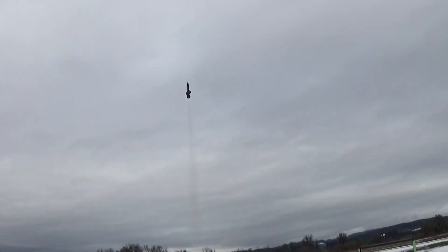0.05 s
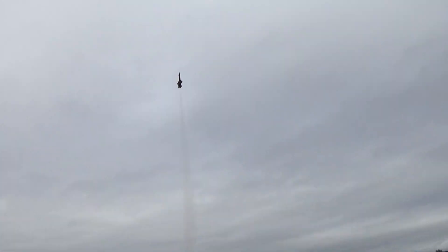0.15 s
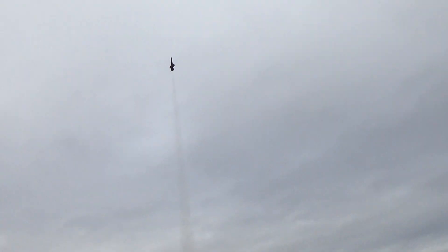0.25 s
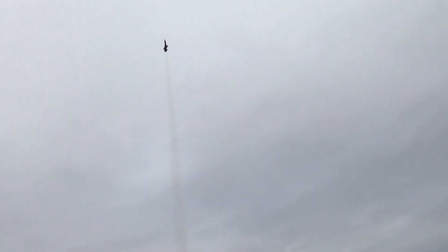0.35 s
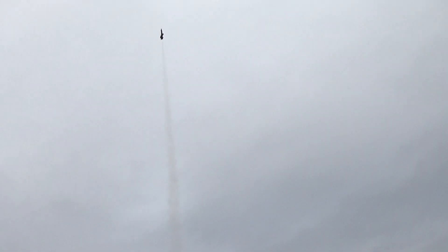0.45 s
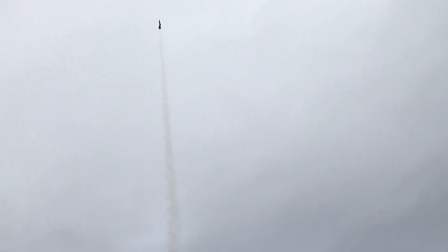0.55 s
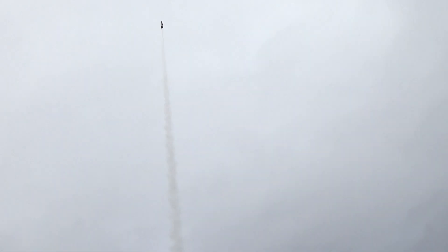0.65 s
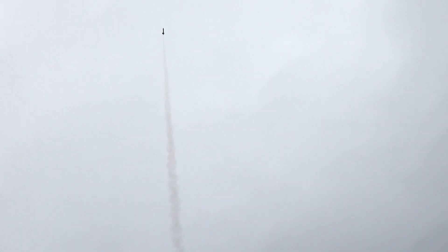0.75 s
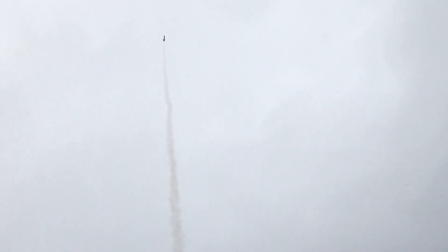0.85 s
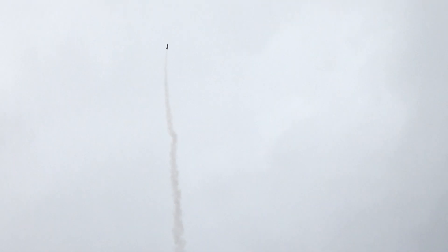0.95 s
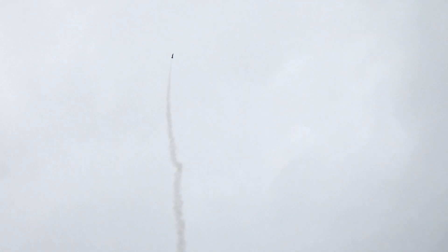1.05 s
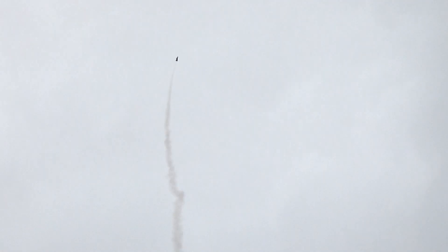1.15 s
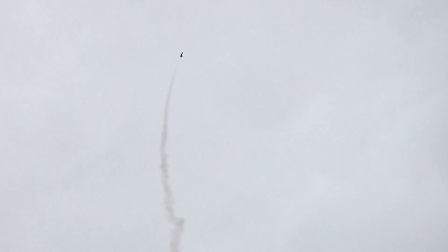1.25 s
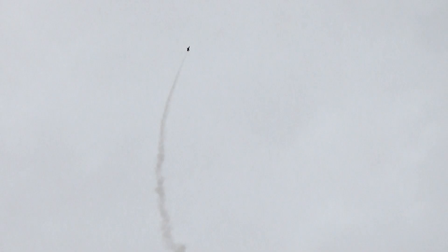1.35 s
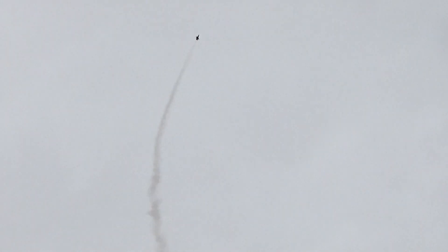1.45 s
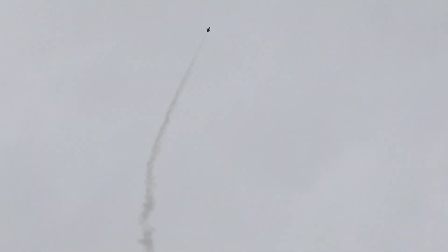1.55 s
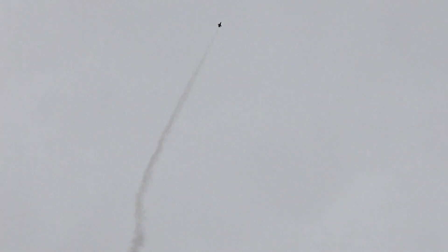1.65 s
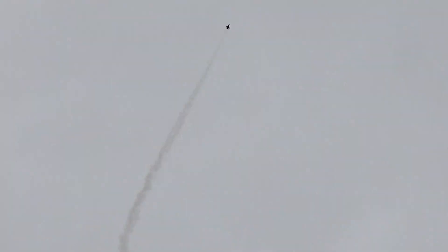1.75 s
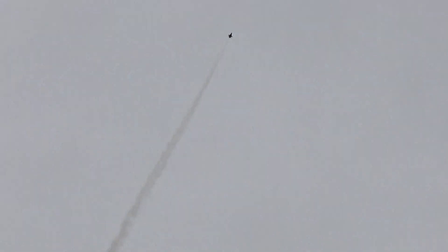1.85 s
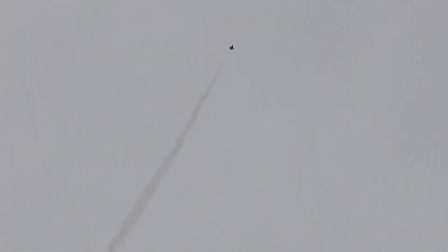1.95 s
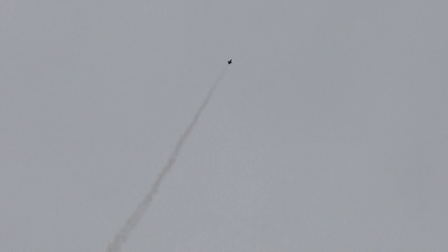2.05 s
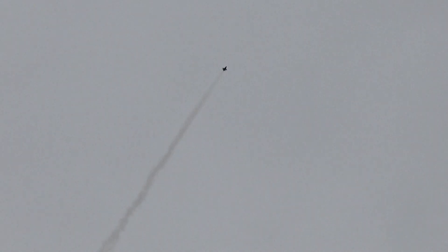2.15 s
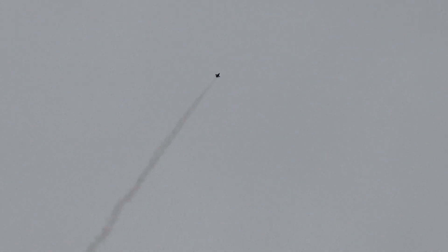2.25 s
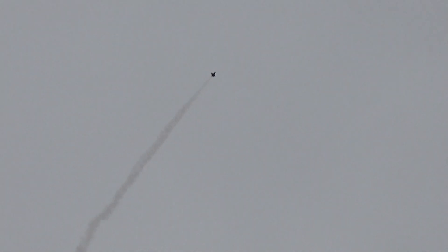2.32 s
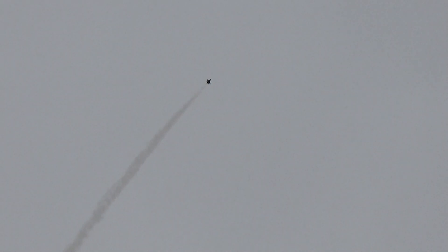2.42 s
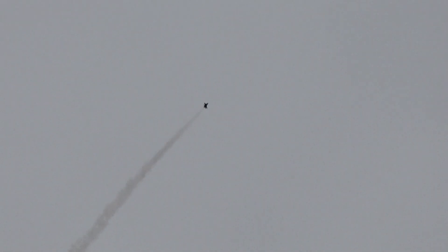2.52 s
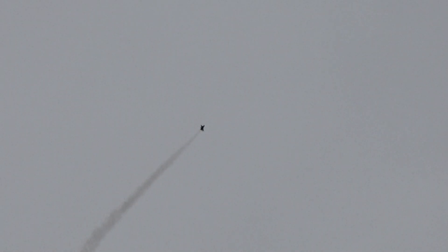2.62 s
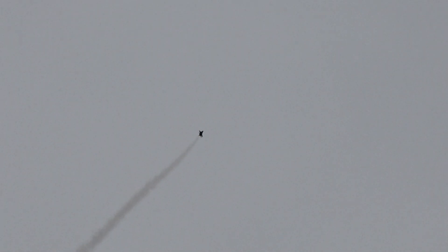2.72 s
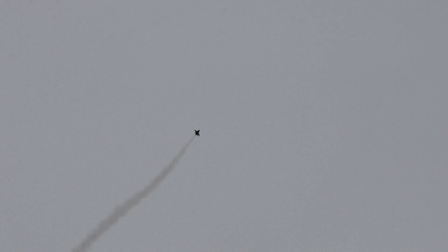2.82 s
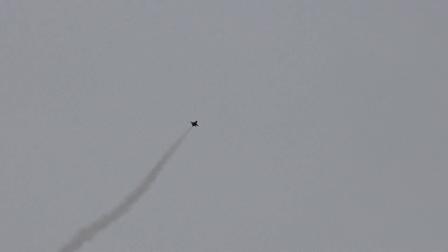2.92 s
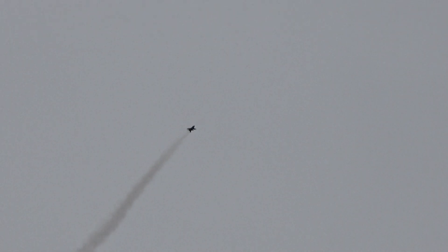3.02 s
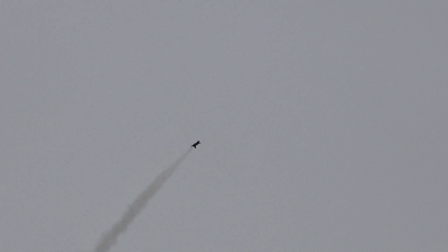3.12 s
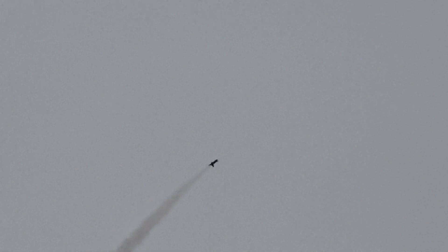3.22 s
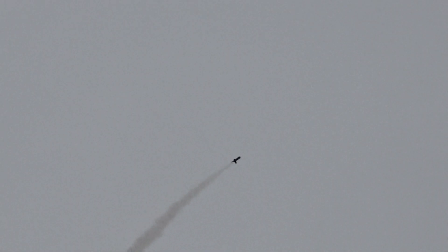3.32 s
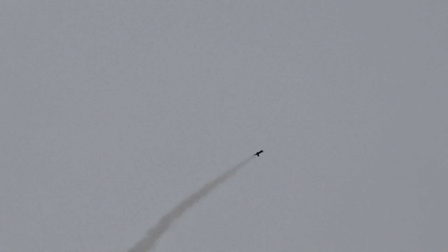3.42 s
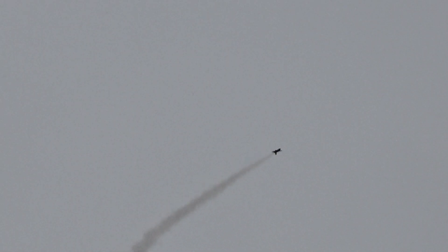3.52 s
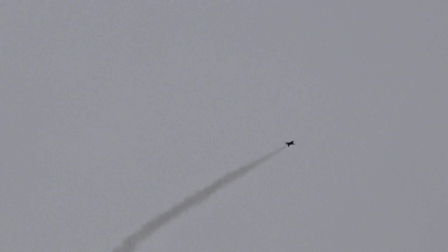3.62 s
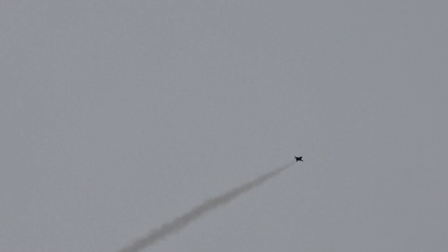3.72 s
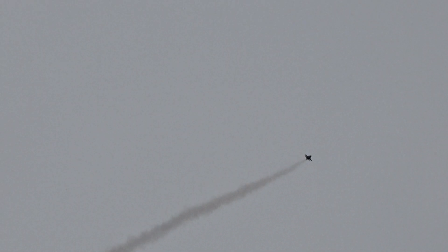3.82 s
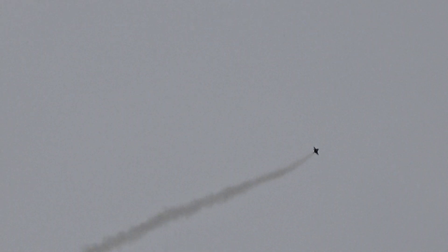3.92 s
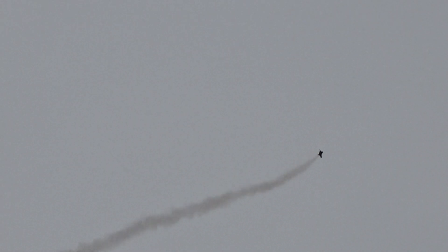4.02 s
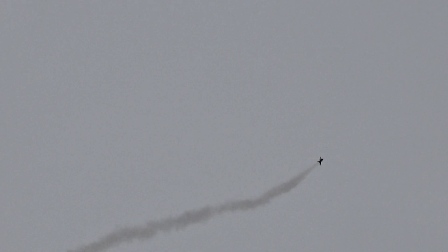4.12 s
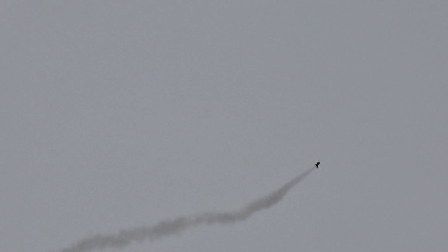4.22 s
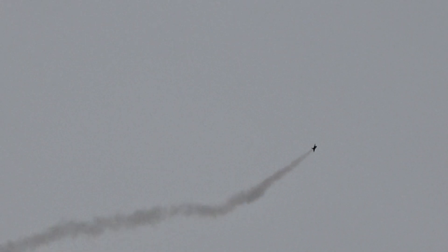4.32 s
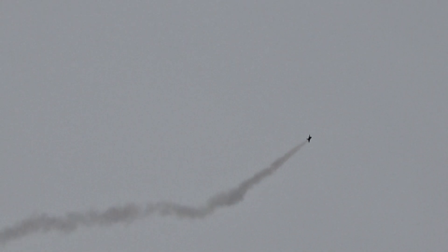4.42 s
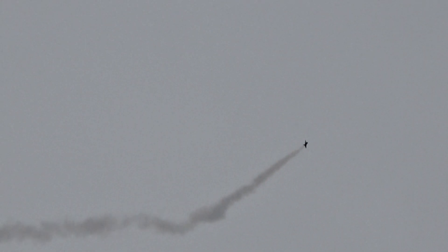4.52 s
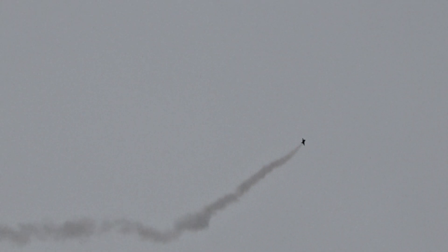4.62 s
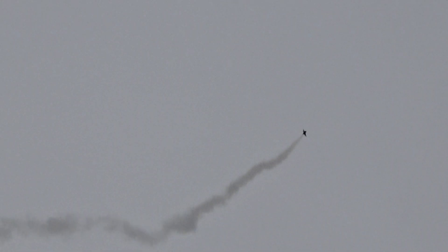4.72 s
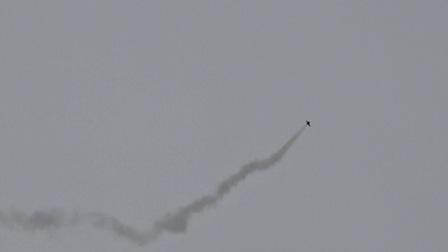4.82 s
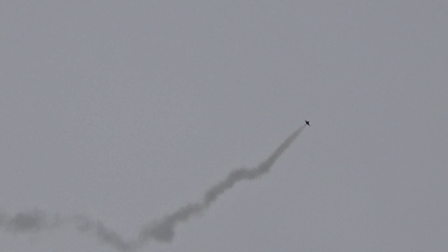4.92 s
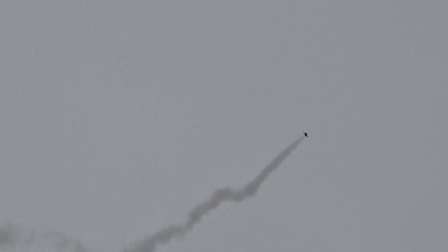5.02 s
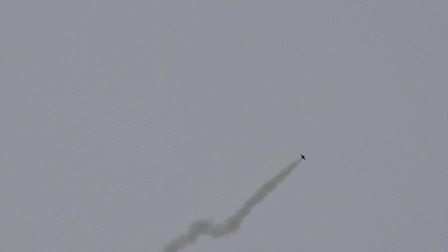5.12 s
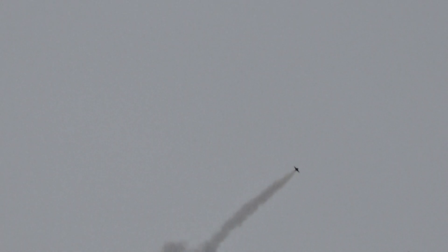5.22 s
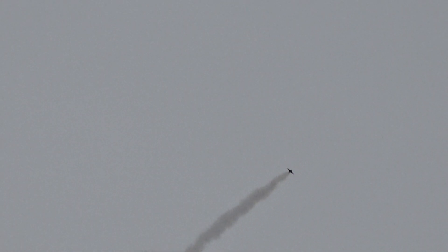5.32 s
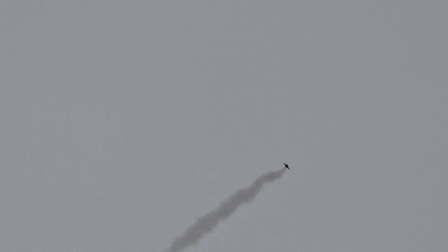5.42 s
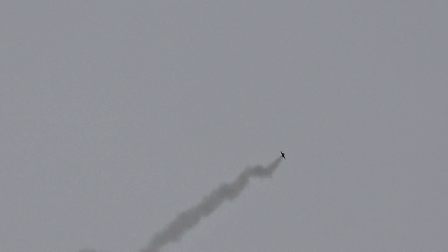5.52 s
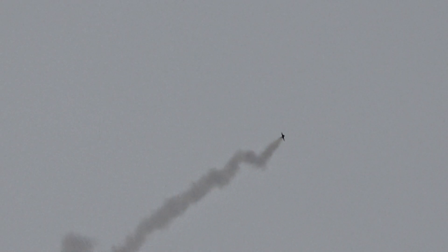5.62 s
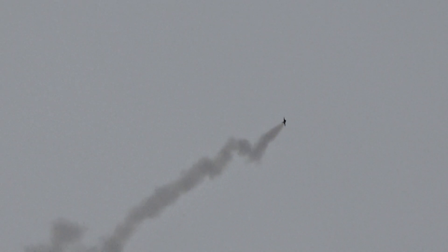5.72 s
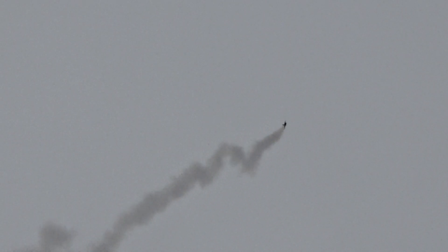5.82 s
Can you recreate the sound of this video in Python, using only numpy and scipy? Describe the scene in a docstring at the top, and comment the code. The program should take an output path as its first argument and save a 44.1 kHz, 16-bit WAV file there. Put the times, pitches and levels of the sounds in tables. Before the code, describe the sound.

A model rocket motor burns with a loud bright crackling hiss, growing duller and more fluttery as it climbs away over an open field.

```python
"""A small solid-fuel motor burns with a bright hiss while the model climbs away and rolls over an open field.
Shaped noise makes the jet: air dulls it with distance, shock fronts crackle in it, dips sweep its treble.
The ground adds a delayed, duller copy of the climb, and single snaps stand out as short pressure pulses.
Soft shaped noise and a distant engine's sine tones lie behind, sinking at first and then swelling.
Dull knocks close to the microphone ring damped modes; one faint low tone rises and fades."""
import sys
import numpy as np
from scipy import signal
from scipy.fft import rfft, irfft
from scipy.io import wavfile
from scipy.ndimage import map_coordinates

SR = 44100
rng = np.random.default_rng(int(sys.argv[2]) if len(sys.argv) > 2 else 0)


def attenuation_scalar(level_db):
    """Turn a level in dB into a linear amplitude multiplier (20 dB per decade)."""
    decades = np.asarray(level_db, float) / 20
    return 10 ** decades


def materialize(psi):
    """Save the field psi as 16-bit PCM at rate SR to the path in sys.argv[1].

    A 1-D psi becomes a single channel; in a 2-D psi each row is a channel.
    """
    bounded = np.clip(np.atleast_2d(psi).T, -1, 1)
    quanta = np.round(bounded * 32767).astype(np.int16)
    wavfile.write(sys.argv[1], SR, quanta)


N = 258237   # length in samples
FRAME, HOP = 512, 128   # analysis frame and its step in samples
HZ = np.maximum(np.fft.rfftfreq(FRAME, 1 / SR), 20)[:, None]   # analysis frequencies, one row each

# The field behind and the place of the jet.
# Each row: time in seconds, background level in dB, how far the jet stands to the right (0-1).
FIELD_AND_PLACE = [(0, -55.5, 0.75), (.7, -67, 0), (1.4, -62.5, 0.45), (2, -56, 0.72), (4, -47.5, 1),
                   (4.8, -45, .99), (5.86, -42.5, 0.96)]


def at_hz(points):
    """Reads a spectrum table at every analysis frequency, along a logarithmic scale."""
    hz, db = np.transpose(points)
    return np.interp(np.log(HZ), np.log(hz), db)


def in_time(rows, s):
    """Reads the columns of a curve table at times s in seconds."""
    t, *columns = np.transpose(rows)
    return [np.interp(s, t, column) for column in columns]


def to_right(s):
    """How far the jet stands to the right at times s, from 0 to 1."""
    return in_time(FIELD_AND_PLACE, s)[1]


def shaped(x, gain_db):
    """A filter that changes with time: gain_db(s) gives dB by frequency and moment."""
    _, s, frames = signal.stft(x, SR, nperseg=FRAME, noverlap=FRAME - HOP)
    _, y = signal.istft(frames * attenuation_scalar(gain_db(s)), SR, nperseg=FRAME, noverlap=FRAME - HOP)
    return y[..., :N]


def drift(rate_hz, count):
    """Slow chance of overall spread 1 at frame times: noise through two equal low-pass poles, one row each."""
    r = np.exp(-2 * np.pi * rate_hz * HOP / SR)
    noise = rng.standard_normal((count, N // HOP + 600))
    slow = signal.lfilter([1], [1, -2 * r, r * r], noise)[:, 500:]   # the filter has settled
    return slow / slow.std()


def high_pass(x, order, hz):
    """Removes what lies below hz."""
    return signal.sosfilt(signal.butter(order, hz, "high", fs=SR, output="sos"), x)


def field_air():
    """Soft far noise with a fixed spectrum, its middle at level 1 and a weaker part opposed left and right."""
    # Spectrum of the field noise. Each row: frequency in Hz, relative density in dB per Hz.
    breeze = [(30, -36), (70, -22), (110, -8), (190, -8), (260, -11), (400, -5), (620, 0), (1300, 4.5),
              (3000, -5.5), (6000, -11), (16000, -39)]
    unlike_db, right_db = -10, 1.2
    low = np.maximum(np.fft.rfftfreq(N, 1 / SR), 20)
    hz, db = np.transpose(breeze)
    gain = attenuation_scalar(np.interp(np.log(low), np.log(hz), db))
    mid, side = irfft(rfft(rng.standard_normal((2, N))) * gain, N)
    side = attenuation_scalar(unlike_db) * high_pass(side, 3, 500)   # bass is alike on both sides
    upper = (attenuation_scalar(right_db) - 1) * high_pass(mid, 2, 400)   # the upper part leans right
    return np.array([mid + side, mid - side + upper]) / mid.std()


def engine_hum(waver_db=1.0):
    """A distant engine: steady sine tones, each slowly wavering in level."""
    # Engine tones. Each row: frequency in Hz, mean level in dB against the background.
    tones = [(78.5, -22.5), (137, -31), (157, -23), (625, -24.5)]
    s = np.arange(N) / SR
    waver = drift(3.9, count=len(tones))
    frame_s = np.arange(waver.shape[1]) * HOP / SR
    hum = np.zeros(N)
    for (hz, db), row in zip(tones, waver):
        level = attenuation_scalar(db + waver_db * np.interp(s, frame_s, row))
        hum += np.sqrt(2) * level * np.sin(2 * np.pi * hz * s)
    return hum


def field():
    """Far noise and engine tones follow one level curve, sinking at first and then swelling together."""
    background_db = in_time(FIELD_AND_PLACE, np.arange(N) / SR)[0]
    return attenuation_scalar(background_db) * (field_air() + engine_hum())


def faint_tone():
    """A faint low sine, gliding in pitch, rises and fades once."""
    # Path of the tone. Each row: time in seconds, frequency in Hz, peak level in dB.
    glide = [(1.6, 315, -85), (2.1, 323.5, -76), (2.25, 338, -66), (2.4, 326, -68), (2.5, 320, -90)]
    hz, db = in_time(glide, np.arange(N) / SR)
    return attenuation_scalar(db) * np.sin(2 * np.pi * np.cumsum(hz) / SR)


def knocks(gain_db=-2):
    """Dull taps close to the microphone ring the same few quickly damped modes."""
    # The taps. Each row: time in seconds, level in dB before gain_db, left minus right in dB.
    tap_rows = [(1.454, -41, 0.0), (1.463, -33, -1), (1.633, -34, -4), (2.571, -22, 3)]
    # What they ring. Each row: frequency in Hz, level in dB added to the tap, time in seconds to fall 60 dB.
    modes = [(520, -22, .007), (900, -13, .008), (1330, -2, .02), (2500, -6, .004), (3600, -6, .003)]
    out = np.zeros((2, N))
    for hz, mode_db, t60 in modes:
        taps = np.full((2, N), 1e-18)   # a trace that keeps the filter out of vanishing numbers
        for s, tap_db, pan_db in tap_rows:
            taps[:, round(s * SR)] = attenuation_scalar(tap_db + mode_db + gain_db + np.array([pan_db, -pan_db]) / 2)
        r, w = attenuation_scalar(-60 / (t60 * SR)), 2 * np.pi * hz / SR
        out += signal.lfilter([0, np.sin(w)], [1, -2 * r * np.cos(w), r * r], taps)
    return high_pass(out, 3, 520)


def ground(x, cut_hz=2500):
    """Adds the duller copy that bounces off the field, later and fainter as the model climbs."""
    # Echo fading as the microphone tilts up. Each row: time in seconds, echo in dB before its low-pass.
    echo = [(0, -2.5), (.7, -3), (1.2, -3.5), (2.6, -21)]
    mic_m, pad_m = 1.63, 20   # microphone height, distance to the pad
    start_m, start_m_per_s, accel = 5.7, 18, 32   # height and speed at the start, acceleration in m/s2
    s = np.arange(N) / SR
    height_m = start_m + start_m_per_s * s + accel * s ** 2 / 2
    lag_s = 2 * mic_m * height_m / np.hypot(height_m, pad_m) / 343   # extra path over the speed of sound
    late = map_coordinates(x, [(s - lag_s) * SR], order=3)
    dull = signal.lfilter(*signal.butter(1, cut_hz, fs=SR), late)
    return x + attenuation_scalar(in_time(echo, s)[0]) * dull


def snaps(gain_db=-1, lean_db=-3.0):
    """Single sharp pulses: mostly the loudest shock fronts, plus a few bright ticks between 1.45 and 1.65 s;
    each is one push between two shallow pulls."""
    # Each row: time in seconds, peak in dB before gain_db and the lean, pitch in Hz.
    fronts = [(0.2909, -9, 3250), (1.4486, -10, 3480), (1.4544, -14, 3000), (1.4642, -9, 3060),
              (1.4672, -8, 3590), (1.5095, -8, 3860), (1.6322, -3.5, 3500), (1.634, -17.5, 1660),
              (1.6426, -2.5, 4170), (1.7382, -8, 3500), (2.091, -12, 3505), (2.2507, -12.5, 3430),
              (2.519, -18, 2400), (3.1241, -10.5, 3005), (3.1401, -11, 2720), (3.5404, -12, 3610),
              (3.8635, -12, 3170), (4.1888, -11, 3320), (4.4175, -14, 2840), (4.5908, -11.5, 2600),
              (4.6192, -13, 2460), (4.696, -14, 3170), (4.962, -15, 2670), (5.2024, -14, 2220),
              (5.3168, -22, 2770), (5.4139, -14, 2470), (5.4953, -16, 2950), (5.5625, -13.5, 2270),
              (5.808, -17.5, 2700)]
    out, near = np.zeros(N), np.arange(-150, 151)
    for s, peak_db, hz in fronts:
        phase = (np.pi * hz * near / SR) ** 2
        out[round(s * SR) + near] += attenuation_scalar(peak_db + gain_db) * (1 - 2 * phase) * np.exp(-phase)
    lean = lean_db * to_right(np.arange(N) / SR) / 2   # lean_db: left minus right, jet far to the right
    return out * attenuation_scalar(np.array([lean, -lean]))


def hollow(centre_hz, octaves):
    """A bell of height 1 around a centre, its spread given in octaves."""
    return np.exp(-.5 * (np.log2(HZ / centre_hz) / octaves) ** 2)


def roll_dips_db(s, flutter):
    """Narrow dips sweep through the treble as the model rolls, narrower as it recedes."""
    # Each row: start and end in seconds, start and end in Hz before wavering, depth in dB halfway.
    dips = [(0.332, 0.466, 5430, 5500, 6.5), (2.251, 2.33, 7960, 11500, 9), (2.39, 2.55, 4800, 13300, 5),
            (2.835, 2.963, 5940, 12800, 6), (3.286, 3.405, 7940, 13200, 8), (3.652, 3.76, 8000, 8500, 6),
            (4.051, 4.135, 3500, 5950, 4), (4.34, 4.457, 6200, 7460, 7), (4.577, 4.74, 7300, 9600, 12),
            (4.87, 5.15, 8500, 4060, 24), (5.046, 5.24, 3360, 4760, 21), (5.106, 5.31, 5660, 6500, 23),
            (5.124, 5.25, 7460, 11000, 1), (5.55, 5.767, 6300, 6600, 11), (5.56, 5.76, 4970, 5050, 19),
            (5.68, 5.9, 7300, 11600, 24), (4.638, 4.8, 10400, 11400, 17), (4.92, 5.08, 11500, 10500, 17),
            (5.27, 5.38, 10300, 11300, 19)]
    octaves_at_start, narrows_per_s = 0.31, 0.046   # spread in octaves and its loss each second
    loss = 0
    for start, end, from_hz, to_hz, depth_db in dips:
        along = np.clip((s - start) / (end - start), 0, 1)
        centre = from_hz * (to_hz / from_hz) ** along
        centre = centre * attenuation_scalar(0.2 * flutter[100, :len(s)])   # wavers with the flutter near 8.6 kHz
        octaves = max(octaves_at_start - narrows_per_s * start, .07)
        loss = loss + depth_db * np.sin(np.pi * along) * hollow(centre, octaves)
    return loss


def housing_db(s):
    """Hollows of the microphone housing deepen as the microphone tilts up."""
    # Each row: centre in Hz, spread in octaves, depth in dB at full tilt.
    hollows = [(1970, 0.17, 3), (3330, 0.012, 8.5), (6260, 0.065, 2), (8260, 0.016, 7.5)]
    tilt_start_s, tilt_end_s = 0.83, 1.1
    tilt = np.clip((s - tilt_start_s) / (tilt_end_s - tilt_start_s), 0, 1)
    return sum(depth_db * tilt * hollow(hz, octaves) for hz, octaves, depth_db in hollows)


def nozzle_db():
    """The close jet's spectrum, set so that its power from 1.5 to 3 kHz is a common reference."""
    # Each row: frequency in Hz, relative density in dB per Hz.
    nozzle = at_hz([(120, -95), (200, -53), (462, -41.5), (497, -50), (535, -39), (812, -33.5),
                    (1170, -31.5), (1260, -28), (2130, -19.5), (9840, 2.5), (12200, -4), (15500, -14)])
    band = (HZ > 1500) & (HZ < 3000)
    return nozzle - 10 * np.log10(np.sum(attenuation_scalar(2 * nozzle[band])) * 2 / FRAME)


def jet_db(s, flutter):
    """Nozzle spectrum, dulled by air and aim, notched by the roll, fluttering with turbulence on the way."""
    # The jet as heard. Each row: time in seconds, level in dB around 2 kHz,
    # treble gain in dB as the nozzle points this way, before its share by frequency.
    jet_path = [(0.0, -40.5, -2), (0.4, -41.5, 6), (0.94, -35, 0.5), (1.16, -36, 4), (1.29, -37, 1),
                (1.55, -38, 3), (1.92, -40.5, 6), (2.2, -40.5, -1), (2.29, -38.5, -2), (2.37, -39.5, .6),
                (2.46, -39, -9.5), (2.58, -38, 7), (2.9, -37, 0.7), (3.0, -37.5, 2.5), (3.18, -36.5, -2.5),
                (3.44, -36, 4.5), (3.72, -37, -2.5), (3.86, -38.5, 10), (3.95, -40, 2), (4.08, -40, 5),
                (4.22, -36.5, 11), (4.4, -38.5, -2.7), (4.6, -38.5, 5), (4.69, -38.5, -2),
                (4.87, -34, -1.5), (5.0, -39, -3), (5.14, -42.5, 8), (5.24, -36.5, -3), (5.34, -35, 6),
                (5.43, -35.5, 3), (5.55, -39.5, 2), (5.7, -40.5, 5.5), (5.86, -38.5, -2.5)]
    # How much of that gain is heard. Each row: frequency in Hz, share (0-1).
    aim_share = [(2200, 0.0), (3900, 0.21), (6200, 0.54), (10000, 0.61), (14000, 0.66)]
    # Loss growing as the model recedes. Each row: frequency in Hz, loss in dB per second of flight.
    air_loss = [(880, 0.5), (2200, 0.0), (3900, 1.58), (6200, 4.5), (10000, 7), (12500, 10), (16000, 14.5)]
    level, aim = in_time(jet_path, s)
    db = nozzle_db() + level + aim * at_hz(aim_share) - s * at_hz(air_loss)
    db = db - roll_dips_db(s, flutter) - housing_db(s)
    return db + flutter[:, :len(s)] * (0.25 + 0.55 * to_right(s))   # a short path crosses little turbulence


def turbulence_db(shared_db=1.26, patch_db=1.81):
    """Level flutter shared by all pitches plus nine patches of pitch; spreads at 8 kHz before the path's share."""
    patch = np.minimum((np.log2(HZ[:, 0] / 20) * .9).astype(int), 8)
    patches = drift(9, count=9)[patch]
    return (shared_db * drift(16, count=1) + patch_db * patches) * np.sqrt(HZ / 8000)   # treble flutters most


def crackle(per_s=500, least_db=9, spread_db=5.0, cut_hz=3000):
    """Positive shock fronts at chance moments, of very uneven size, softened by a low-pass both ways."""
    size = attenuation_scalar(least_db + spread_db * np.minimum(rng.exponential(1, N), 3.5))
    fronts = (rng.random(N) < per_s / SR) * size
    return signal.filtfilt(*signal.butter(1, cut_hz, fs=SR), fronts)


def jet(alike_db=20):
    """Turbulent hiss and crackle with the ground echo, leaning sideways, plus a part unlike left and right."""
    # Lean with the jet far to the right. Each row: frequency in Hz, left minus right in dB.
    lean_points = [(300, -8), (500, 13), (770, -6), (1170, 0), (1800, 1), (2900, -2.5), (4200, -1),
                   (6400, 0), (10000, -1.5)]
    # Unlike part with the jet far to the right. Each row: frequency in Hz, level in dB against the jet.
    scatter = [(300, -32), (800, -40), (1800, -13.5), (3000, -13.5), (4500, -20.5), (5600, -23),
               (7300, -18.5), (8200, -18), (8900, -22.5), (10000, -23), (11000, -29)]
    hiss, unlike_hiss = rng.standard_normal((2, N))
    hiss = ground(hiss + crackle())
    flutter = turbulence_db()

    def lean(s):
        return at_hz(lean_points) * to_right(s) / 2

    def centred(s):   # straight ahead the lows agree
        return alike_db * (1 - to_right(s)) * np.clip(1 - HZ / 7000, 0, 1)

    left = shaped(hiss, lambda s: jet_db(s, flutter) + lean(s))
    right = shaped(hiss, lambda s: jet_db(s, flutter) - lean(s))
    unlike = shaped(unlike_hiss, lambda s: jet_db(s, flutter) + at_hz(scatter) - centred(s))
    return np.array([left + unlike, right - unlike])


def scene():
    """The jet and its snaps over the field, the knocks and the faint tone."""
    return jet() + snaps() + field() + knocks() + faint_tone()


def low_pass(x):
    """Removes everything above the highest recorded frequency."""
    return signal.sosfilt(signal.butter(12, 15660, fs=SR, output="sos"), x)


def record(dry):
    """The loudest peaks are rounded off smoothly, never passing the ceiling."""
    ceiling = 1.1
    rounded = ceiling * np.tanh(dry / ceiling)
    return low_pass(rounded)


dry = scene()
out = record(dry)
materialize(out)
```